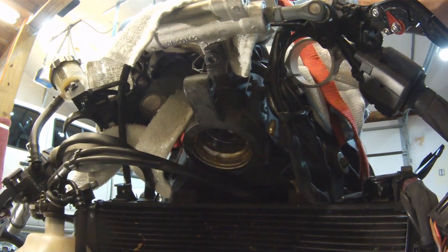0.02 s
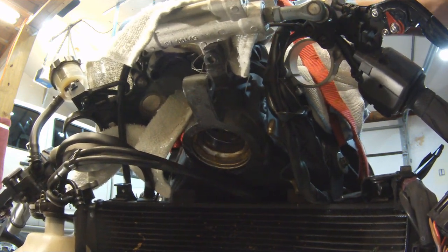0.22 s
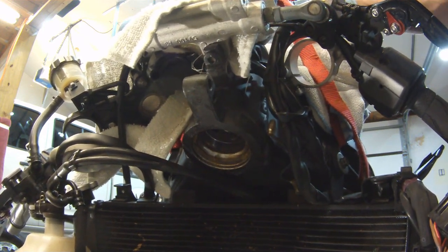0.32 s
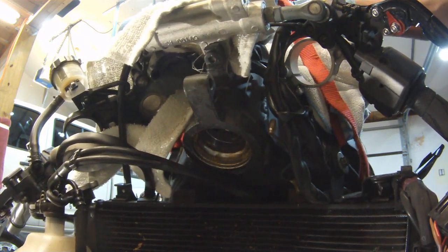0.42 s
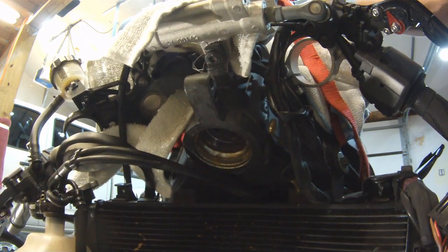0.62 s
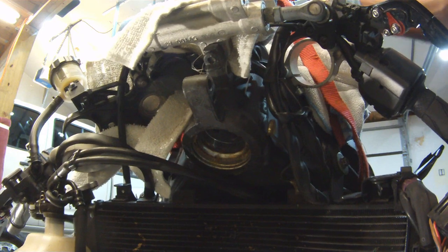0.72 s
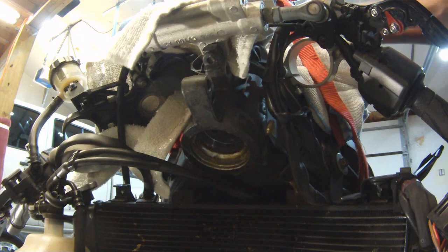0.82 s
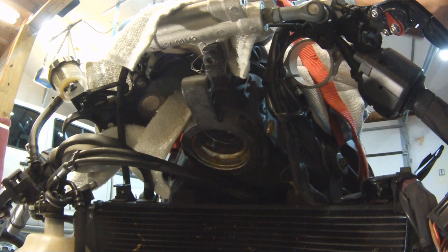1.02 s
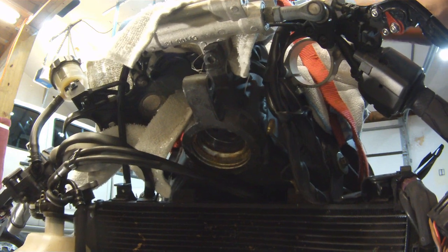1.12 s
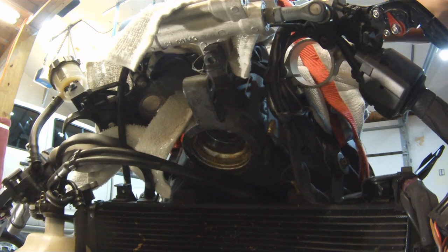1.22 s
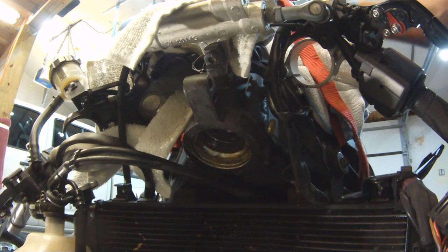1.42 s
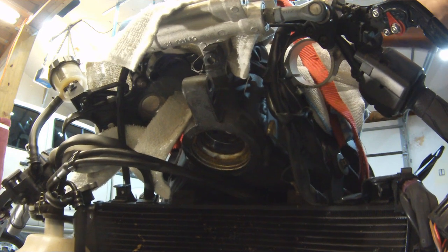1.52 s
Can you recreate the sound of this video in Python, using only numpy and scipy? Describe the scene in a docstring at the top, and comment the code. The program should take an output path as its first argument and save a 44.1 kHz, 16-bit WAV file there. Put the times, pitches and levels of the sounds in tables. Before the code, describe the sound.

Evenly spaced hammer blows on a steel punch set in a machine frame, hard and dry with short metallic ping, loose parts clattering, a quick wall echo and faint hiss, heard close up.

```python
"""A hammer drives a steel punch into a machine frame in a garage, close to a small microphone.
Each blow sums damped sines (steel ping, hollow knock, later thump, frame hum, thin plate)
with bursts of coloured noise (crack, clatter of loose parts).
A wall 10.35 m off returns each blow once and decaying noise makes the room tail;
steady noise gives the faint hiss and the slow sub-bass sway."""
import sys
import numpy as np
from scipy import signal
from scipy.fft import rfft, irfft, next_fast_len
from scipy.io import wavfile
from scipy.ndimage import uniform_filter1d

SR = 44100
rng = np.random.default_rng(int(sys.argv[2]) if len(sys.argv) > 2 else 0)


def linear_from_db(decibels):
    """Turn decibels (scalar or array-like) into linear amplitude factors; 0 gives 1."""
    return 10 ** (np.asarray(decibels, float) / 20)


def file_out(sig):
    """Save sig as 16-bit WAV at sys.argv[1]."""
    # one column per channel
    cols = np.atleast_2d(sig).T
    # limit, then scale
    lim = np.clip(cols, -1, 1)
    pcm = np.round(lim * 32767).astype(np.int16)
    wavfile.write(sys.argv[1], SR, pcm)


N = 68355  # length in samples

STEEL_RISE_S, KNOCK_RISE_S, THUMP_RISE_S = 0.00051, 0.00069, 0.00085  # time constants
THUMP_LAG_S = 0.0085  # the frame answers this long after the hammer lands


def along(points, hz):
    """Reads (Hz, value) points at the given frequencies, on a log frequency axis."""
    f, value = np.transpose(points)
    return np.interp(np.log(hz + 1), np.log(f + 1), value)


def coloured(x, points):
    """Filters x to a (Hz, dB) colour without shifting its phase."""
    size = next_fast_len(len(x) + 8192)
    gain = linear_from_db(along(points, np.fft.rfftfreq(size, 1 / SR)))
    return irfft(rfft(x, size) * gain, size)[:len(x)]


def noise(points, size):
    """Coloured noise of rms 1."""
    x = coloured(rng.standard_normal(size), points)
    return x / np.sqrt(np.mean(x ** 2))


def rise(t, rise_s):
    """Exponential onset: the blow takes a moment to set its parts moving."""
    return 1 - np.exp(-t / rise_s)


def ring(modes, t, rise_s, spread_db, phase=0):
    """Damped sines from t = 0, levels (and phases, by a share of a turn) redrawn at every blow."""
    t = np.maximum(t, 0)
    starts = 2 * np.pi * phase * rng.uniform(size=len(modes))
    total = np.zeros(len(t))
    for (hz, db, t60), start in zip(modes, starts):
        decay = linear_from_db(db + rng.normal(0, spread_db) - 60 * t / t60)
        total += decay * np.sin(2 * np.pi * hz * t + start)
    return rise(t, rise_s) * total


# Steel punch, damped by the hand. Each row: mode in Hz, relative level in dB, t60 in seconds.
PUNCH_MODES = [(3650, -10.5, 0.011), (6050, -14.5, .015), (7236, 1, 0.017), (7650, -17, .015),
               (10400, -3.5, 0.013), (14400, -17, 0.019)]


def punch_ping(t):
    """The punch's high steel modes ring for a few hundredths of a second."""
    return ring(PUNCH_MODES, t, STEEL_RISE_S, spread_db=2, phase=1)


# Colour of the steel crack. Each row: frequency in Hz, relative density in dB per Hz.
CRACK_COLOUR = [(880, -34), (1500, 6.5), (4330, -1), (5020, 0), (7240, 7.5), (8240, 5.5), (13000, -6),
                (16000, -23)]


def steel_crack(t):
    """Noise burst of the contact: a very short crack over a weaker, longer chatter."""
    crack_t60_s, chatter_db, chatter_t60_s = 0.012, -13.5, 0.07
    decay = linear_from_db(-60 * t / crack_t60_s) + linear_from_db(chatter_db - 60 * t / chatter_t60_s)
    return noise(CRACK_COLOUR, len(t)) * decay * rise(t, STEEL_RISE_S)


# Hollow knock of the struck part. Each row: mode in Hz, relative level in dB, t60 in seconds.
KNOCK_MODES = [(479, -2, 0.067), (418, -1.5, 0.093), (672, -11, 0.038), (876, -23, 0.075),
               (1175, -28, 0.088)]


def hollow_knock(t):
    """The struck part's low modes, set off as the hammer lands."""
    return ring(KNOCK_MODES, t, KNOCK_RISE_S, spread_db=2.5)


# Thump of the frame. Each row: mode in Hz, relative level in dB, t60 in seconds.
THUMP_MODES = [(335.3, 2.5, 0.05), (274, -1.5, 0.024), (189.2, -6.5, 0.078), (122, -33, 0.02)]


def frame_thump(t):
    """Deeper modes that start as the shock reaches the frame."""
    return ring(THUMP_MODES, t - THUMP_LAG_S, THUMP_RISE_S, spread_db=4)


# Hum of the frame. Each row: mode in Hz, relative level in dB, t60 in seconds.
FRAME_MODES = [(148, -29.5, 0.37), (169, -30.5, .22), (194, -38.5, .22), (269.4, -16.5, 0.34),
               (285.4, -24, 0.39), (310.3, -24.5, 0.31), (380.7, -24.5, 0.38), (399.2, -18.5, 0.21),
               (436.55, -26.5, .7)]


def frame_hum(t):
    """Weaker, lightly damped modes in which the frame hums on."""
    return ring(FRAME_MODES, t - THUMP_LAG_S, THUMP_RISE_S, spread_db=3.5)


# Colour of the loose parts. Each row: frequency in Hz, relative density in dB per Hz.
CLATTER_COLOUR = [(450, -41.5), (620, -4), (800, 4.5), (1200, -3), (2000, -8.5), (2700, -18.5), (3600, -18),
                  (5000, -30), (6500, -61)]


def loose_clatter(t):
    """Loose parts clatter: a mid-range noise burst with a t60 of 62 ms."""
    return noise(CLATTER_COLOUR, len(t)) * rise(t, STEEL_RISE_S) * linear_from_db(-60 * t / 0.062)


# Thin plate near the punch. Each row: mode in Hz, relative level in dB, t60 in seconds.
PLATE_MODES = [(1650, -0.5, 0.078), (1696, -8.5, 0.099), (1569, -6.5, .12), (1772, -4, 0.068)]


def thin_plate(t):
    """A cluster of close modes beats as the plate rings."""
    return ring(PLATE_MODES, t, THUMP_RISE_S, spread_db=3, phase=0.91)


def microphone(x):
    """The small microphone close by cuts the bass and the extreme top of the blow."""
    band_hz = [129.6, 15400]
    return signal.sosfilt(signal.butter(4, band_hz, "band", fs=SR, output="sos"), x)


def blow(knock_db, ping_db, crack_db, clatter_db, plate_db):
    """One direct blow; knock, thump and hum share one level, as parts of one body."""
    t = np.arange(SR // 2) / SR
    steel = linear_from_db(ping_db) * punch_ping(t) + linear_from_db(crack_db) * steel_crack(t)
    body = linear_from_db(knock_db) * (hollow_knock(t) + frame_thump(t) + frame_hum(t))
    rattle = linear_from_db(clatter_db) * loose_clatter(t) + linear_from_db(plate_db) * thin_plate(t)
    return microphone(steel + body + rattle)


# Reflection off the far wall. Each row: frequency in Hz, gain in dB.
WALL_GAIN = [(150, -9), (320, -9), (480, -13), (1300, -5), (3600, -14), (7000, -17.5), (11000, -23.5),
             (15000, -34)]


def wall_echo(x):
    """The far wall returns the sound once, after the trip there and back."""
    wall_m, sound_m_per_s = 10.35, 343
    lag = round(2 * wall_m / sound_m_per_s * SR)
    return coloured(np.pad(x, (lag, 0)), WALL_GAIN)[:len(x)]


# Decay of the garage. Each row: frequency in Hz, t60 in seconds.
TAIL_T60 = [(150, 0.78), (500, 0.31), (1500, 0.38), (4000, .42), (10000, 0.46)]
# Strength of the garage tail. Each row: frequency in Hz, gain in dB.
TAIL_GAIN = [(150, -20), (400, -13), (1000, -3), (2000, -12), (4000, -12), (7200, -19), (10000, -18.5),
             (15000, -17.5)]


def room_tail():
    """Diffuse reflections as noise that swells, then decays at its own rate in each band."""
    hz, t, bands = signal.stft(rng.standard_normal(SR // 2), SR, nperseg=256)
    shape = linear_from_db(-60 * t / along(TAIL_T60, hz)[:, None]) * rise(t, 0.02)
    # equal energy in every band before the gain
    shape = shape / np.sqrt(128 * np.sum(shape ** 2, axis=1, keepdims=True))
    gain = linear_from_db(along(TAIL_GAIN, hz))[:, None]
    return signal.istft(bands * shape * gain, SR, nperseg=256)[1]


def garage(x):
    """The direct sound and its wall echo, both feeding the diffuse tail."""
    early = x + wall_echo(x)
    tail = room_tail()
    return np.pad(early, (0, len(tail) - 1)) + signal.fftconvolve(early, tail)


# Colour of the background hiss. Each row: frequency in Hz, relative density in dB per Hz.
HISS_COLOUR = [(35, -40.5), (60, 10.5), (71, -8), (190, -15.5), (452, -12), (657, -4.5), (757, -13.5),
               (1100, -13), (1180, -20), (1300, -16), (14200, -28.5), (16400, -41)]


def hiss():
    """Faint steady noise under the blows."""
    return linear_from_db(-60.5) * noise(HISS_COLOUR, N)


# Colour of the sub-bass sway. Each row: frequency in Hz, relative density in dB per Hz.
SWAY_COLOUR = [(1, 10), (4, 12), (15, -2), (30, -46.5), (70, -53.5), (90, -120)]


def sway():
    """Noise mostly below 15 Hz, a slow drift more than a tone."""
    return linear_from_db(-48.5) * noise(SWAY_COLOUR, N)


# Hammer blows: start of each in seconds; the first falls before the start and leaves only its tail.
BLOW_STARTS = [-.11, .2272, .5740, .9040, 1.2498]
# Strength of each blow. Each row: knock, ping, crack, clatter and plate levels, all in dB.
BLOW_LEVELS = [(-23.5, -43, -33.5, -48, -48.5), (-3.5, -19, -21, -13.5, -30),
               (-3.5, -12.5, -18.5, -20.5, -29.5), (-5, -40, -18.5, -18.5, -28),
               (-5.5, -25, -22.5, -19, -24)]


def scene():
    """All blows in the garage over the background."""
    lead = SR // 4  # room for the blow before the start
    out = np.zeros(lead + N + 2 * SR)
    for start_s, levels in zip(BLOW_STARTS, BLOW_LEVELS):
        heard = garage(blow(*levels))
        first = lead + round(start_s * SR)
        out[first:first + len(heard)] += heard
    return (out[lead:lead + N] + hiss() + sway())[None]


def gain_control(x):
    """Turns down by a share of each peak's excess, 15 ms late, then recovers slowly."""
    threshold_db, share, recover_db_per_s, late_s = -10.5, 0.55, 2.5, 0.015
    t = np.arange(N) / SR
    excess_db = np.maximum(20 * np.log10(abs(x[0]) + 1e-9) - threshold_db, 0)
    recovered_db = recover_db_per_s * t
    # hold the deepest cut so far, less what has been recovered since
    cut_db = np.maximum.accumulate(share * excess_db + recovered_db) - recovered_db
    late_cut_db = np.interp(t - late_s, t, cut_db)
    return x * linear_from_db(-uniform_filter1d(late_cut_db, size=88))  # 2 ms smoothing


def input_stage(x):
    """Rounds off the highest peaks below a ceiling."""
    ceiling, knee = 0.95, 5  # full scale is 1; a higher knee bends later
    return x / (1 + abs(x / ceiling) ** knee) ** (1 / knee)


def roll_off(x):
    """The treble ends steeply here."""
    return signal.sosfilt(signal.butter(12, 16530, fs=SR, output="sos"), x)


def record(dry):
    """The recorder's slow gain control, then its input stage."""
    mix = input_stage(gain_control(dry))
    return roll_off(mix)


dry = scene()
out = record(dry)
file_out(out)
```